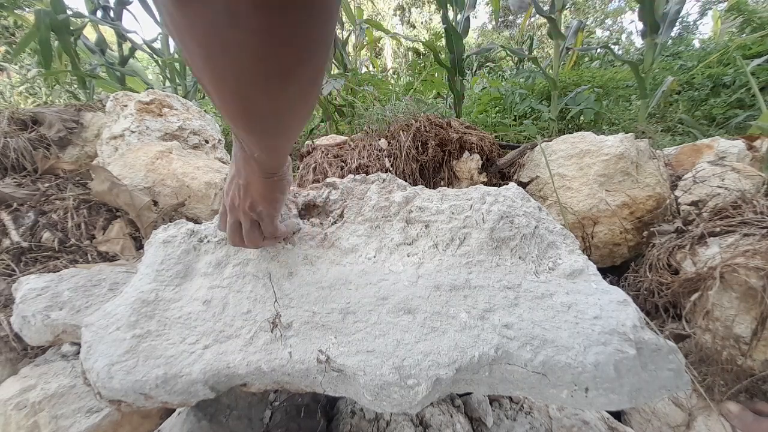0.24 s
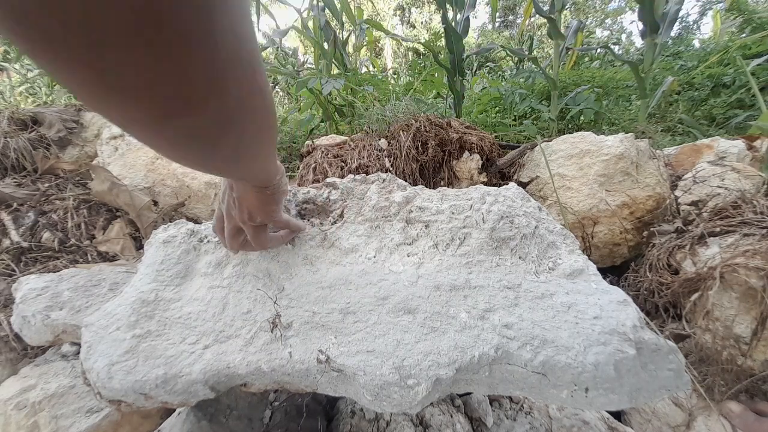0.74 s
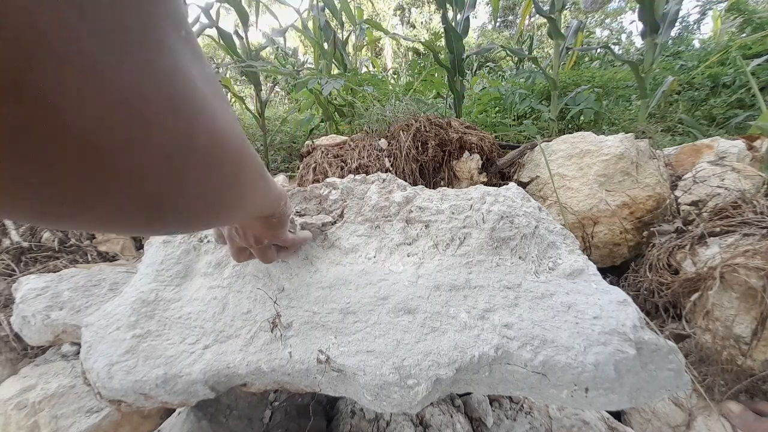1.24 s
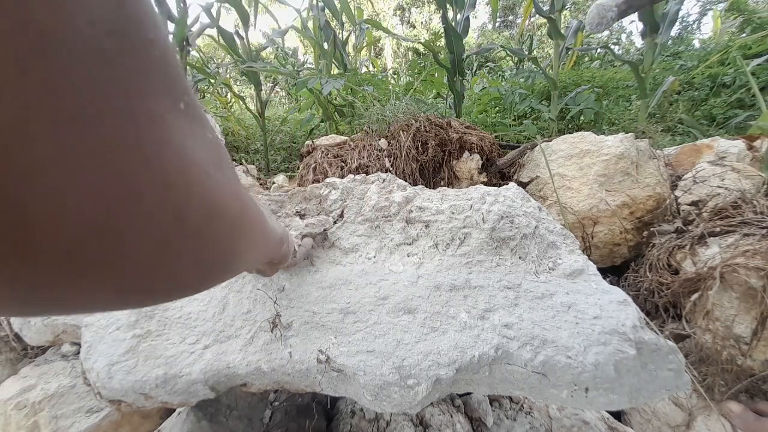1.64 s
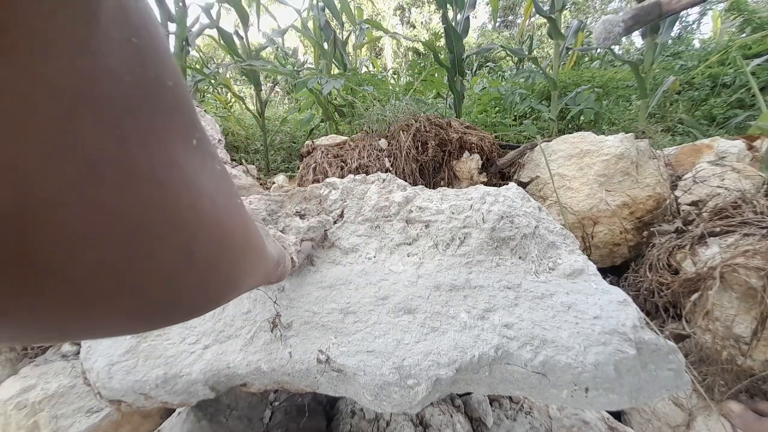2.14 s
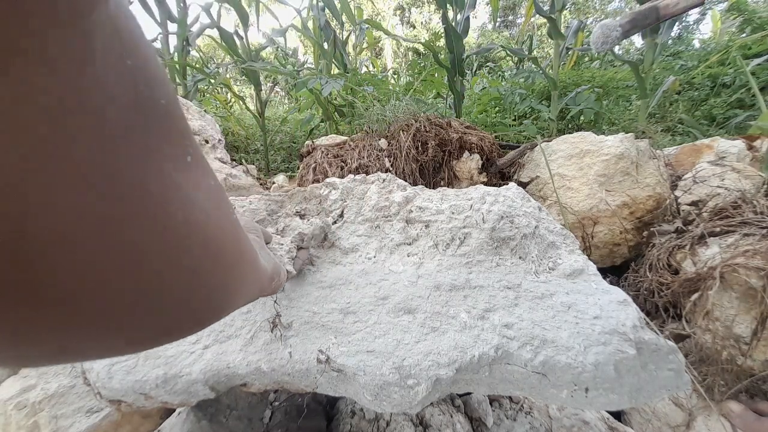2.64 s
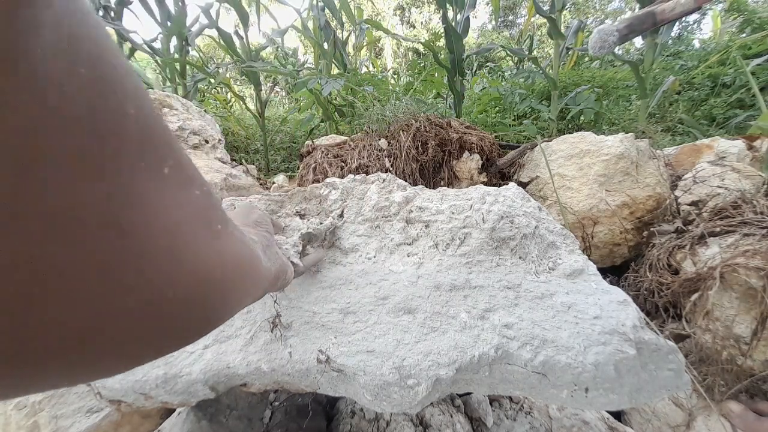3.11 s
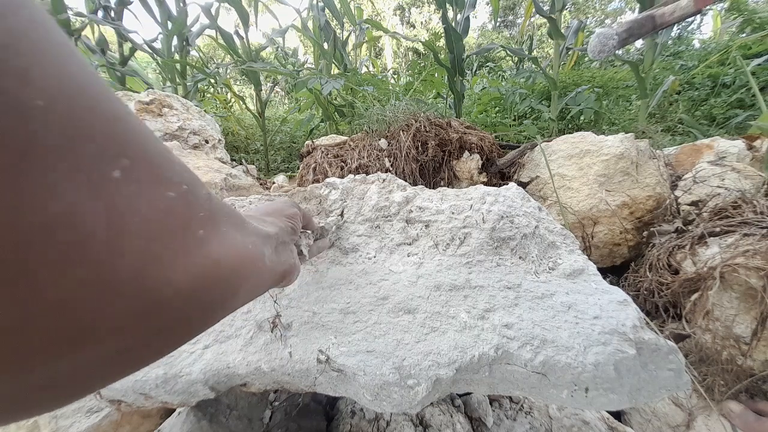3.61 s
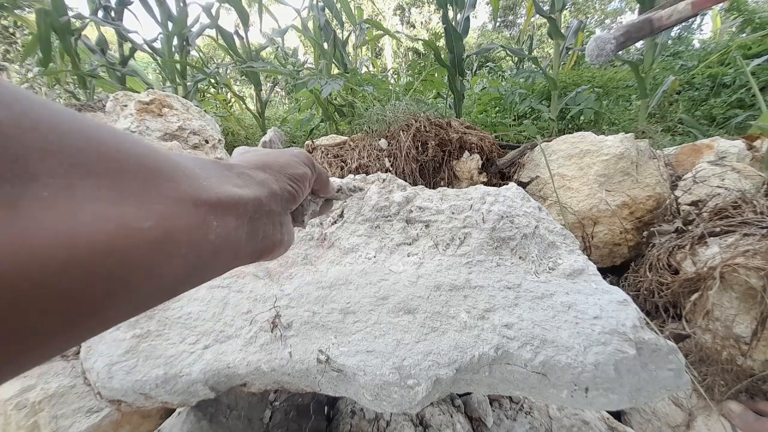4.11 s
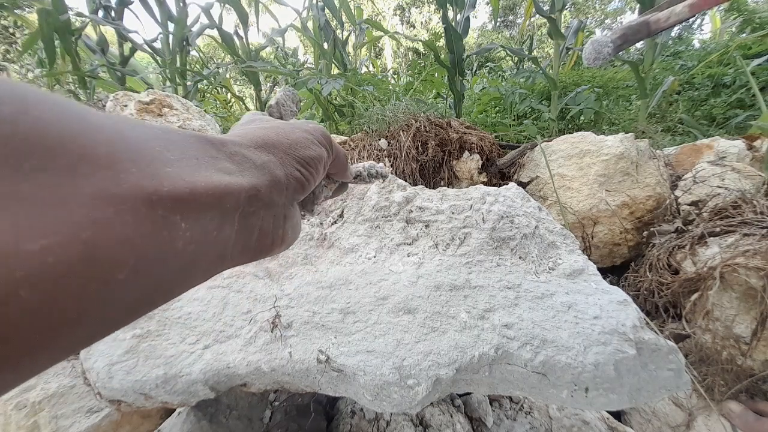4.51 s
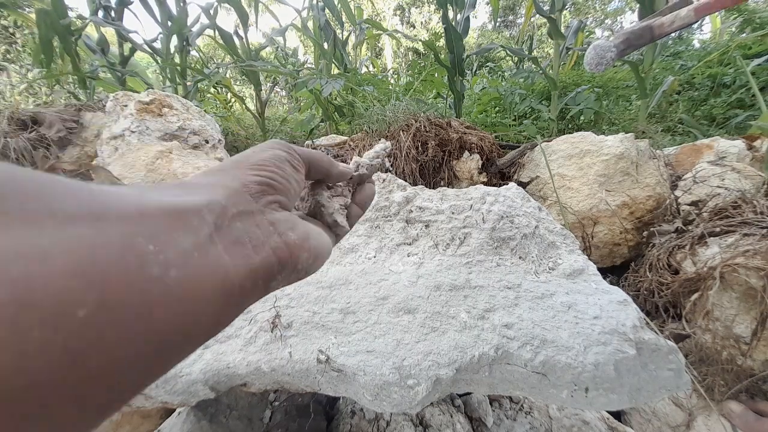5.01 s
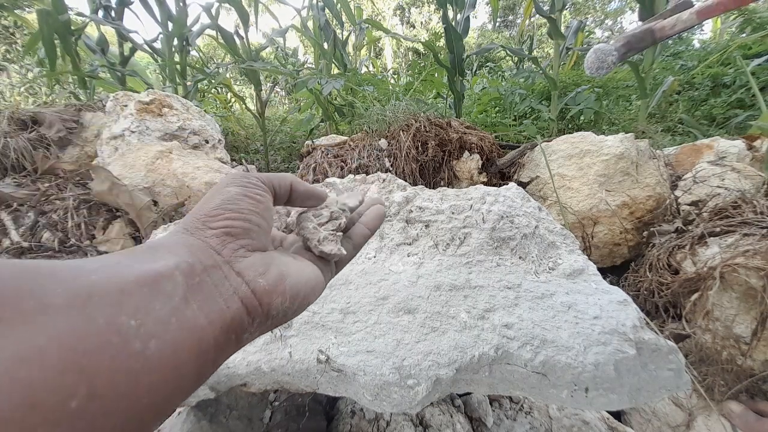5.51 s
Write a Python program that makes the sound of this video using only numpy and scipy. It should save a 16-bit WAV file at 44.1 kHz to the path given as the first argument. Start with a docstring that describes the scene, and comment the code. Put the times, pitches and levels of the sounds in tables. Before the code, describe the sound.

Close to the microphone, a hand works broken chips loose from a limestone slab. Dense clacks, snaps and sandy grinding come first, thin out mid-way, then return around one loud sharp crack near four seconds. After that only a few tiny ticks remain. Outdoors, dry and open, with small low wind puffs mainly on the right and a very faint distant engine hum.

```python
"""Outdoors, at a cracked limestone slab close to the microphone, loose chips are prised off by hand.
Impulsive fracture forces excite damped resonances: pieces snap, clack and knock, and crumbs flake off.
Heavy pieces thud on low modes; grit and sand grind as dense trains of filtered random clicks.
Shaped noise gives a breeze, puffs at the right port and a quiet field; swelling narrow bands give faint
far notes, and a sum of wavering harmonics gives the hum of a distant engine."""
import sys
import numpy as np
from scipy import signal
from scipy.fft import rfft, irfft, next_fast_len
from scipy.io import wavfile
from scipy.ndimage import uniform_filter1d

SR = 44100
rng = np.random.default_rng(int(sys.argv[2]) if len(sys.argv) > 2 else 0)


def generate_wav(signal):
    """Clip the signal to [-1, 1] and save it as 16-bit WAV at the path in sys.argv[1]."""
    frames = np.transpose(np.atleast_2d(signal))
    scaled = np.clip(frames, -1, 1) * 32767
    pcm = np.round(scaled).astype(np.int16)
    wavfile.write(sys.argv[1], SR, pcm)


N = 253575

# Puffs of wind: (time [s], relative level [dB], Gaussian spread [s])
GUSTS = [(.149, -33.5, 0.024), (.208, -30, 0.016), (.496, -33.5, 0.021), (.55, -36.5, 0.032),
         (.91, -29.5, 0.028), (2.138, -26, 0.019), (2.245, -30, .022), (2.321, -34, 0.023),
         (2.4, -39, 0.096), (2.62, -40.5, 0.048), (2.954, -35.5, 0.04), (3.01, -27, 0.0063),
         (3.126, -32.5, 0.061), (3.323, -28, 0.012), (3.408, -39, 0.034), (3.868, -35.5, 0.019),
         (5.028, -44.5, 0.018), (5.29, -35.5, .014), (5.587, -39.5, 0.012), (5.701, -40, 0.019)]
# Steady low rumble of the breeze: (time [s], relative level [dB])
BREEZE = [(0, -43), (.9, -52), (1.25, -59), (1.45, -51), (3.2, -50.5), (4.05, -51), (4.7, -70), (5, -54),
          (5.75, -60)]
# Wind noise spectrum: (frequency [Hz], relative level [dB])
WIND_SPECTRUM = [(15, -33), (33, -13), (50, 0.5), (75, 3.5), (100, -1.5), (140, -12), (200, -20),
                 (300, -31.5), (600, -49), (2000, -82.5)]
# Far engine: (time [s], firing rate [1/s], relative level [dB])
ENGINE = [(0, 42.7, -63), (1, 44.6, -64.5), (1.6, 43.2, -61), (2.3, 46.8, -60), (2.8, 47.4, -60.5),
          (3.4, 46.7, -68.5), (4, 48.4, -67), (4.5, 44, -80), (5.75, 51, -79.5)]
# Exhaust harmonics: (multiple of firing rate [1], relative level [dB])
ENGINE_HARMONICS = [(2, 1.5), (3, -8), (4, -6), (5, 1), (6, -12.5), (7, -21.5)]
# Hush of the field, spectrum: (frequency [Hz], relative level [dB])
AIR_SPECTRUM = [(30, -18), (150, 7.5), (270, -2.5), (400, -12), (700, -24), (1400, -19), (2500, -18.5),
                (5500, -16), (8200, -19.5), (9500, -24.5), (16000, -26.5)]
AIR_DB = -64.5  # rms level

# Creep of the pieces on grit: (time [s], relative grit level [dB], relative sand level [dB])
CREEP = [(0.0, -67.5, -55.5), (0.4, -61, -57.5), (0.98, -66.5, -64), (1.14, -67, -69.5),
         (1.36, -71.5, -73.5), (1.5, -62.5, -52.5), (1.63, -64, -57), (2.11, -64, -66.5), (2.55, -70, -64),
         (2.72, -73.5, -72), (2.91, -71.5, -69), (3.22, -67.5, -66.5), (3.67, -68.5, -65),
         (3.86, -66.5, -65.5), (4.05, -62, -57), (4.31, -62, -58), (4.6, -73.5, -72), (5.75, -75, -71.5)]
GRIT_DB, SAND_DB = 2, 4  # added to the two creep levels
# Short slides, swelling and dying: (time [s], grit level [dB], Gaussian spread [s])
SLIDES = [(.118, -52, 0.026), (.24, -53.5, 0.04), (.385, -49, .026), (.79, -58.5, 0.044),
          (1.37, -55, 0.041), (1.56, -65, 0.026), (3.345, -63.5, 0.023), (3.955, -51, 0.021),
          (4.15, -53, 0.027), (4.24, -61, 0.019)]
SLIDE_SAND_DB = 3  # sand hiss of a slide relative to its grit
# Coarse grit spectrum: (frequency [Hz], relative level [dB])
GRIT_SPECTRUM = [(170, -13), (330, 1), (480, -3.5), (680, -2), (1200, -2), (1700, -0.5), (3500, -5.5),
                 (5000, -34), (9000, -42)]
# Fine sand spectrum: (frequency [Hz], relative level [dB])
SAND_SPECTRUM = [(1500, -12.5), (3200, -6), (4500, -5.5), (6000, -3), (8200, -4), (9300, -13.5),
                 (12000, -9), (16000, -15)]

# Stone contacts: (time [s], relative slab knock level [dB], relative chip clack level [dB],
# relative edge snap level [dB], chip pitch [Hz], crumbling time [s], relative left-right bias [dB])
CRACKS = [(0.041, -76, -74, -48, 7000, 0.00057, 13), (0.1106, -46, -42, -43, 2640, 0.0032, -1),
          (0.131, -40.5, -40, -60, 1820, 0.0016, -4), (.2122, -73, -47, -42.5, 7300, 0.0017, 4),
          (0.2195, -49, -48, -43.5, 5930, 0.0085, -3), (0.2632, -54, -48, -52, 3480, .006, -4.5),
          (0.2786, -48, -43, -41.5, 3300, 0.0025, 2), (0.3617, -50, -51, -41, 3370, 0.0048, 0),
          (.3668, -43, -50, -43, 7600, 0.005, -4), (0.394, -43.5, -54, -60, 2500, .002, -7),
          (0.4335, -62, -50.5, -37.5, 7160, 0.01, 3.5), (.52, -70, -59, -45.5, 5700, 0.0024, -1),
          (.5451, -74, -71.5, -32.5, 5400, 0.00084, -1), (0.5709, -65, -56, -41.5, 7600, 0.0033, 7),
          (.5977, -50.5, -38, -42, 2640, 0.0021, -4), (.6542, -39, -37.5, -36, 4440, 0.0058, -2),
          (0.668, -49, -60, -43, 8100, 0.0014, 3), (0.6867, -68, -50, -38, 7950, 0.0015, 4.5),
          (0.758, -39.5, -46, -42, 4470, .003, 1.5), (0.7948, -52.5, -54, -45.5, 9100, 0.00079, -2),
          (0.9304, -69.5, -69, -50, 8600, 0.0021, 1), (1.055, -71, -71, -50.5, 5500, 0.0016, 4),
          (1.0877, -55, -39, -43, 3160, 0.0017, -2), (1.317, -65, -47, -59, 4130, .0005, -1),
          (1.3321, -38, -46, -46, 2020, 0.0028, 5), (1.3362, -36, -36, -46, 2010, 0.002, 0),
          (1.3617, -45, -42, -35.5, 8260, 0.0038, 1.5), (1.3775, -44, -47, -42, 1890, 0.011, -2),
          (1.5042, -46, -31.5, -41, 1620, 0.0018, -6.5), (1.5315, -65, -48.5, -47, 3400, 0.0013, -6),
          (1.544, -60, -48, -42, 7500, 0.0026, 4.5), (1.5706, -67, -51.5, -41.5, 6100, 0.00078, -3),
          (1.6177, -65, -43, -43, 3460, 0.0015, 0), (1.6472, -54.5, -41.5, -51, 2580, 0.0024, 1),
          (1.664, -78.5, -67, -44, 7100, .0017, 5), (1.6882, -48.5, -36, -40, 3970, 0.002, -4),
          (1.712, -51, -45, -36, 5400, 0.0024, 0), (1.7485, -47.5, -38, -41, 1940, .002, -2.5),
          (1.8059, -72, -58, -46.5, 5800, 0.0015, -3), (1.8432, -63, -46, -48.5, 1720, 0.003, 0),
          (1.96, -61, -38.5, -41.5, 2300, 0.0019, 1.5), (1.9865, -74, -61, -53.5, 5600, 0.0024, 6),
          (2.0525, -50, -49.5, -58, 1700, 0.0091, 0), (2.3445, -86, -59, -50, 6710, 0.0021, 2),
          (2.4278, -49.5, -43, -40.5, 5750, 0.0017, 2), (2.4741, -63, -56.5, -53, 7800, .001, 1),
          (2.8876, -82, -81, -55, 6700, 0.0017, -1), (3.069, -52, -51.5, -55, 3540, 0.0019, -1),
          (3.121, -73, -50.5, -45, 3730, 0.0048, 0.5), (3.151, -42, -45, -48.5, 1550, 0.0012, -3),
          (3.2755, -69, -37, -36, 2400, 0.0021, -0.5), (3.3355, -56.5, -43, -60.5, 3240, 0.00032, 1),
          (3.4526, -82, -61, -57, 7000, .0024, 8), (3.5173, -82, -56.5, -41.5, 5500, 0.001, -0.5),
          (3.6084, -46, -43.5, -46.5, 1760, 0.0027, -2), (3.698, -84, -51, -46.5, 7050, 0.00085, 0),
          (3.8203, -55.5, -55, -51.5, 4740, 0.0012, -2), (3.861, -55, -49.5, -45, 5360, .0036, 1),
          (3.8793, -24.5, -30, -32.5, 4200, 0.0027, -2.5), (3.9586, -44, -47, -45.5, 1590, 0.0057, -1),
          (3.9778, -55, -50, -43, 7460, 0.0043, 2), (4.0494, -72.5, -63, -49.5, 5650, 0.0027, 0),
          (4.0607, -56, -49, -41.5, 6700, 0.0016, -3), (4.1238, -42, -52, -39.5, 6840, 0.0082, -2),
          (4.136, -53, -36, -43.5, 3700, 0.0025, 0), (4.2156, -54.5, -42, -42, 2750, 0.016, 1.5),
          (4.2537, -60, -43, -43, 3270, 0.0039, -1), (4.35, -57.5, -50.5, -43.5, 6870, 0.0047, 2),
          (4.378, -51.5, -40.5, -43, 3730, .0026, -2.5), (4.4563, -79, -73, -43, 7600, 0.0013, 4),
          (4.468, -63, -49, -46, 1940, 0.0042, -1), (4.5197, -55, -52.5, -56, 3030, 0.0023, -2),
          (4.816, -87, -65, -59, 5770, .0016, 5.5), (5.349, -81, -78, -50.5, 7240, 0.0019, 4),
          (5.6066, -83, -76, -55, 6760, .0015, 6), (5.6647, -82.5, -73, -55, 6700, .0008, 8),
          (5.7026, -54, -49.5, -45.5, 4640, 0.0024, 3), (5.7353, -59, -63, -52, 5100, 0.00055, -3)]
# Modes of the slab with a loose piece on it: (frequency [Hz], bandwidth [Hz], relative level [dB])
SLAB_MODES = [(594, 79, 4), (690, 83, 1.5), (860, 72, 2.5), (1147, 184, 1), (1750, 360, -10)]
# Chip clack filter: (frequency [Hz], relative level [dB])
CLACK_SPECTRUM = [(700, -46.5), (1400, 0.5), (1800, -2.5), (2700, 2), (3700, -1.5), (5000, -21),
                  (9000, -48.5)]
# Edge snap filter: (frequency [Hz], relative level [dB])
SNAP_SPECTRUM = [(1500, -31), (3200, -11), (4500, -2.5), (6000, 0.5), (8000, 3), (9300, -9), (12000, -5),
                 (16000, -13.5)]

# Crumbs snap off at random, louder and more often as the sand is pressed harder
MAX_CRUMBS_PER_S, CRUMB_OVER_SAND_DB = 24, 5.5  # the rate holds at the hardest pressure
CRUMB_RATE_FOLLOWS = 0.6  # share of the sand's swing in dB
# Crumb filter: (frequency [Hz], relative level [dB])
CRUMB_SPECTRUM = [(1500, -25), (3200, 0), (4500, -1), (6000, -3.5), (8000, 4), (9300, -5.5), (12000, -1),
                  (16000, -5)]

# A heavy piece rocks on its bed: (time [s], relative level [dB])
THUDS = [(0.131, -42), (0.376, -49), (0.654, -45.5), (0.758, -48), (1.336, -38), (1.378, -51),
         (1.704, -51.5), (3.151, -54), (3.88, -45.5), (3.958, -53), (4.124, -39.5), (5.7009, -52)]
# Low modes of the heavy piece: (frequency [Hz], bandwidth [Hz], relative level [dB])
BED_MODES = [(215, 51, 2), (397, 39, 5)]
# Thin far notes: (time [s], pitch [Hz], relative level [dB], Gaussian spread [s])
FAR_NOTES = [(1.2, 2960, -81.5, 0.063), (5.016, 1370, -75, 0.093), (5.33, 5270, -59, 0.013),
             (5.383, 5450, -66, 0.011), (5.427, 5220, -65, .018)]
# The right port faces away from the stone: (frequency [Hz], gain [dB])
SHADOW = [(200, 2), (600, -2.5), (1200, -3), (2200, -2), (5000, 0.5), (8000, -4.5), (16000, -9)]
PORT_LAG = 8  # samples by which the right port hears the stone later
CUTOFF_HZ = 16200


def from_db(db):
    """Logarithmic measure: decibels to amplitude gain."""
    return 10 ** (np.asarray(db) / 20)


def rms_one(x):
    """Normalization: scale to a root-mean-square value of 1."""
    return x / np.sqrt(np.mean(x ** 2) + 1e-20)


def in_time(rows):
    """Linear interpolation: each column of a time curve at every sample."""
    s, *columns = np.transpose(rows)
    return [np.interp(np.arange(N) / SR, s, c) for c in columns]


def bell(centre_s, spread_s):
    """Gaussian envelope: a smooth swell with a peak of 1."""
    t = np.arange(N) / SR
    return np.exp(-((t - centre_s) / spread_s) ** 2 / 2)


def swells(rows):
    """Superposition: the sum of Gaussian swells, as a gain at every sample."""
    return sum(from_db(db) * bell(s, spread_s) for s, db, spread_s in rows)


def colour(x, spectrum):
    """Minimum phase: a causal filter whose phase follows from its magnitude through the cepstrum."""
    size = 2 * next_fast_len(x.shape[-1] // 2 + 1)
    hz, db = np.transpose(spectrum)
    grid = np.maximum(np.fft.rfftfreq(size, 1 / SR), 1)
    magnitude = from_db(np.interp(np.log(grid), np.log(hz), db))
    cepstrum = irfft(np.log(magnitude))
    # folding negative time onto positive time makes the response causal
    cepstrum[1:size // 2] *= 2
    cepstrum[size // 2 + 1:] = 0
    response = np.exp(rfft(cepstrum))
    return irfft(rfft(x, size) * response)[..., :x.shape[-1]]


def noise(spectrum, likeness):
    """Partial coherence: stereo noise of rms 1, partly shared by the two ports."""
    shared = np.sqrt(likeness) * rng.standard_normal(N)
    separate = np.sqrt(1 - likeness) * rng.standard_normal((2, N))
    return rms_one(colour(shared + separate, spectrum))


def wind():
    """Turbulent pressure: low noise rumbles on both ports, and puffs catch mainly the right one."""
    eddies = noise(WIND_SPECTRUM, likeness=0.069)
    # evening out the running power leaves the puffs to set the level
    eddies /= np.sqrt(uniform_filter1d(eddies ** 2, size=1500, axis=1) + 0.01)
    puffs = swells(GUSTS) * eddies * from_db([[-23], [-1.5]])
    breeze_db, = in_time(BREEZE)
    breeze = from_db(breeze_db - 2.5) * noise(WIND_SPECTRUM, likeness=0.64)
    return puffs + breeze


def waver():
    """Slow random modulation: straight lines between 50 random values spread over the scene."""
    return np.interp(np.arange(N), np.linspace(0, N, num=50), rng.standard_normal(50))


def engine():
    """Harmonic series: low exhaust lines, wavering on their way through the air."""
    rate, db = in_time(ENGINE)
    phase = 2 * np.pi * np.cumsum(rate) / SR
    hum = np.zeros(N)
    for multiple, line_db in ENGINE_HARMONICS:
        gain = from_db(db + line_db + 4.0 * waver())
        hum += gain * np.sin(multiple * phase + 0.5 * waver())
    return from_db(1.0) * hum


def field_air():
    """Diffuse background: steady coloured noise, largely common to both ports."""
    return from_db(AIR_DB) * noise(AIR_SPECTRUM, likeness=0.82)


def at_ports(x, pan_db, scatter, scatter_s):
    """Early reflection: direct sound, plus dense echoes off hand and rock that differ at each port."""
    t = np.arange(SR // 50) / SR
    paths = rng.standard_normal((2, len(t))) * np.exp(-t / scatter_s)
    paths *= scatter / np.linalg.norm(paths, axis=1, keepdims=True)
    paths[:, 0] = 1
    paths[1] = np.roll(paths[1], PORT_LAG)
    heard = signal.oaconvolve(x[None], paths, axes=1)[:, :len(x)]
    return heard * from_db([[pan_db / 2], [-pan_db / 2]])


def grains(per_s, spread_db, clump_db, pan_db, scatter, spots):
    """Stick-slip: clumped clicks of uneven size, at many spots that each reflect differently."""
    clumps = rms_one(uniform_filter1d(rng.standard_normal(N), size=200))
    size_db = spread_db * np.minimum(rng.exponential(1, N), 4) + clump_db * np.clip(clumps, -2, 2)
    sign = rng.choice([-1, 1], N)
    happens = rng.random(N) < per_s / SR
    clicks = from_db(size_db) * sign * happens
    spot = rng.integers(0, spots, N)
    return sum(at_ports(clicks * (spot == k), pan_db, scatter, scatter_s=0.003) for k in range(spots))


def grinding():
    """Granular friction: grit and sand under the pieces, in a slow creep and in short slides."""
    grit_db, sand_db = in_time(CREEP)
    slide = swells(SLIDES)
    coarse = grains(per_s=1100, spread_db=2.0, clump_db=3.0, pan_db=5.5, scatter=1.0, spots=6)
    fine = grains(per_s=1500, spread_db=4.0, clump_db=5.0, pan_db=1.5, scatter=5.2, spots=9)
    # creep and slides add in power
    grit_gain = np.hypot(from_db(grit_db + GRIT_DB), slide)
    sand_gain = np.hypot(from_db(sand_db + SAND_DB), slide * from_db(SLIDE_SAND_DB))
    grit = grit_gain * rms_one(colour(coarse, GRIT_SPECTRUM))
    sand = sand_gain * rms_one(colour(fine, SAND_SPECTRUM))
    return grit + sand


def resonate(x, hz, width_hz):
    """Damped oscillation: a two-pole resonance with gain 1 on top."""
    r = np.exp(-np.pi * width_hz / SR)
    numerator = np.array([1, 0, -1]) * (1 - r * r) / 2
    denominator = [1, -2 * r * np.cos(2 * np.pi * hz / SR), r * r]
    return signal.lfilter(numerator, denominator, x)


def fracture(t, crumble_s, grains_per_s, run_level, dust):
    """Brittle fracture: a first break, a run of smaller ones, then a little trickling dust."""
    breaks = rng.standard_normal(len(t)) * (rng.random(len(t)) < grains_per_s / SR)
    decay = np.exp(-(t / crumble_s) ** 1.43 / 2) + dust * np.exp(-t / 0.039)
    run = breaks * decay
    # a longer run carries more energy
    force = run / (np.linalg.norm(run) + 1e-9) * run_level * np.sqrt(crumble_s / 0.0024)
    force[0] = 1
    return force


def strike(force, modes, uneven_db):
    """Modal excitation: stone modes of alternating sign, stirred differently at each contact."""
    out = np.zeros(len(force))
    for k, (hz, width_hz, db) in enumerate(modes):
        gain = from_db(db + rng.normal(0, uneven_db))
        out += resonate(force, hz, width_hz) * gain * (-1) ** k
    return out


def chip_ring(force, pitch_hz, lead_db, tick):
    """Free vibration: a bare tick, the main mode, and heavily damped ones that depend on chip shape."""
    others = np.zeros(len(force))
    for hz in np.geomspace(1600, 7400, num=8):
        shifted_hz = hz * np.exp(rng.normal(0, 0.059))
        others += resonate(force, shifted_hz, 330) * rng.choice([-1, 1])
    main = from_db(lead_db) * resonate(force, pitch_hz, 0.13 * pitch_hz)
    return tick * force + 0.62 * others + main


def add(out, s, sound, db):
    """Energy equivalence: mix in a sound with the energy of the given rms level held for 10 ms."""
    start = int(s * SR)
    gain = from_db(db) * np.sqrt(2 * (SR // 100) / np.sum(sound ** 2))
    out[:, start:start + sound.shape[1]] += gain * sound


def cracks():
    """Impact response: each contact knocks the slab, rings a chip of its own pitch and snaps the edge."""
    out, t = np.zeros((2, N + SR)), np.arange(SR // 14) / SR
    slab_band = signal.butter(2, [300, 2200], "band", fs=SR, output="sos")
    for s, knock_db, clack_db, snap_db, pitch_hz, crumble_s, pan_db in CRACKS:
        push = fracture(t, crumble_s, grains_per_s=2800, run_level=0.27, dust=0.18)
        force = fracture(t, crumble_s, grains_per_s=5000, run_level=1.0, dust=0.059)
        knock = signal.sosfilt(slab_band, strike(push, SLAB_MODES, uneven_db=1.84))
        clack = colour(chip_ring(force, pitch_hz, lead_db=5.0, tick=0.74), CLACK_SPECTRUM)
        snap = colour(chip_ring(force, pitch_hz, lead_db=-0.5, tick=0.9), SNAP_SPECTRUM)
        add(out, s, at_ports(knock, pan_db + 7.5, scatter=0.6, scatter_s=0.0017), knock_db - 0.5)
        add(out, s, at_ports(clack, pan_db + 7.0, scatter=0.75, scatter_s=0.0014), clack_db - 0.5)
        add(out, s, at_ports(snap, pan_db, scatter=1.0, scatter_s=0.00072), snap_db + 0.41)
    return out[:, :N]


def crumbs():
    """Random point process: tiny flakes snap off at uneven moments, too light to knock the slab."""
    out, t = np.zeros((2, N + SR)), np.arange(SR // 50) / SR
    _, sand_db = in_time(CREEP)
    rate = MAX_CRUMBS_PER_S * from_db(CRUMB_RATE_FOLLOWS * (sand_db - sand_db.max()))
    due = np.cumsum(rate) / SR  # expected number of crumbs so far
    for k in range(int(due[-1])):
        at = np.searchsorted(due, k + rng.random())
        force = fracture(t, crumble_s=0.00041, grains_per_s=5000, run_level=0.66, dust=0.014)
        ring = chip_ring(force, rng.uniform(3600, 8800), lead_db=3.0, tick=1.0)
        snap = colour(ring, CRUMB_SPECTRUM)
        db = sand_db[at] + SAND_DB + CRUMB_OVER_SAND_DB
        add(out, at / SR, at_ports(snap, pan_db=6, scatter=1.0, scatter_s=0.0018), db)
    return out[:, :N]


def thuds():
    """Soft impact: the weight of a big piece comes down gently and stirs only the low modes."""
    out, t = np.zeros((2, N + SR)), np.arange(SR // 10) / SR
    for s, db in THUDS:
        thud = strike(np.exp(-t / 0.0004), BED_MODES, uneven_db=1.0)
        add(out, s, at_ports(thud, pan_db=2.5, scatter=0.54, scatter_s=0.016), db)
    return out[:, :N]


def far_notes():
    """Narrow-band noise: resonant filtering of hiss gives faint, rough notes from the field."""
    hiss = rng.standard_normal((2, N))
    out = np.zeros((2, N))
    for s, hz, db, spread_s in FAR_NOTES:
        width_hz = 0.09 * hz
        note = resonate(resonate(hiss, hz, width_hz), hz, width_hz)
        out += from_db(db) * bell(s, spread_s) * rms_one(note)
    return out


def scene():
    """Superposition: stone in front, with the wind, engine and hush of the field around it."""
    field = wind() + engine() + far_notes() + field_air()
    left, right = cracks() + thuds() + grinding() + crumbs()
    return np.array([left, colour(right, SHADOW)]) + field


def record(dry):
    """Band limitation: an elliptic low-pass cuts the top of the band steeply."""
    return signal.sosfilt(signal.ellip(10, 0.2, 70, CUTOFF_HZ, fs=SR, output="sos"), dry)


dry = scene()
out = record(dry)
generate_wav(out)
```